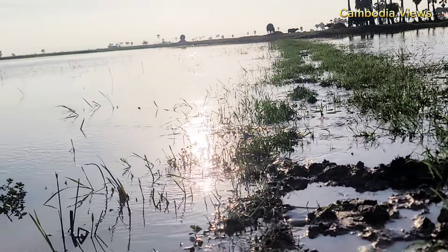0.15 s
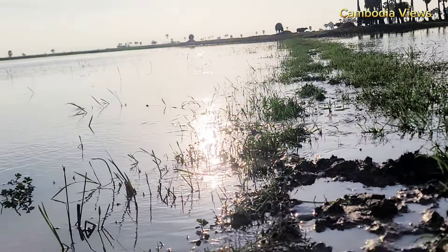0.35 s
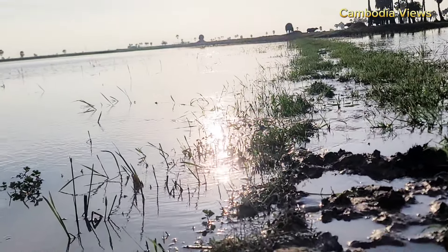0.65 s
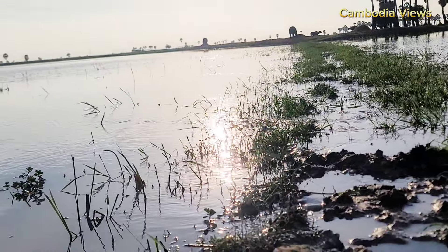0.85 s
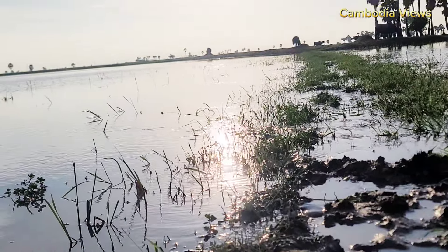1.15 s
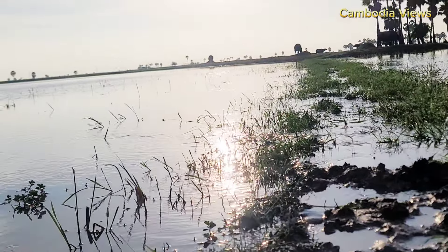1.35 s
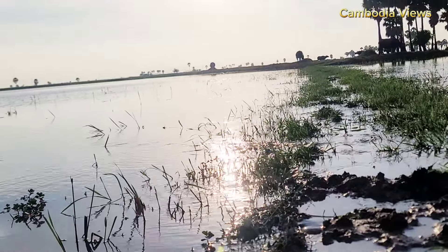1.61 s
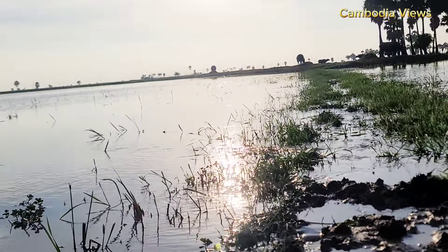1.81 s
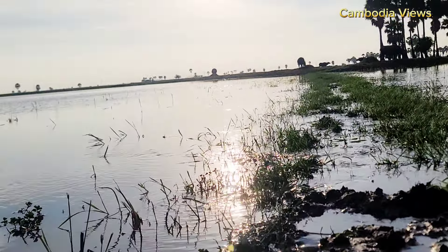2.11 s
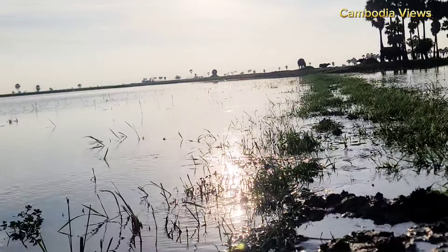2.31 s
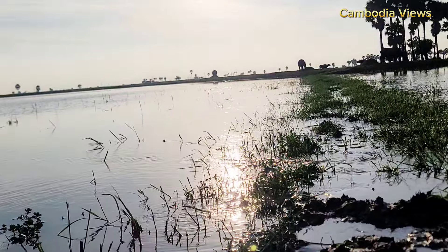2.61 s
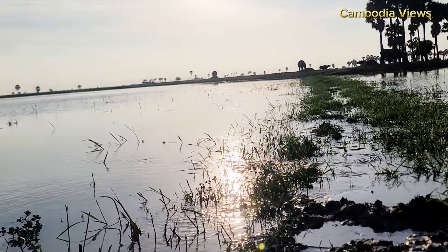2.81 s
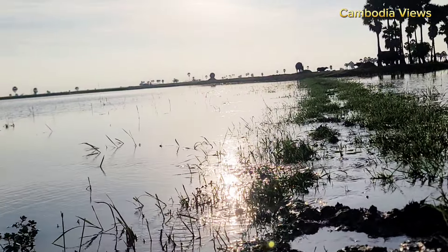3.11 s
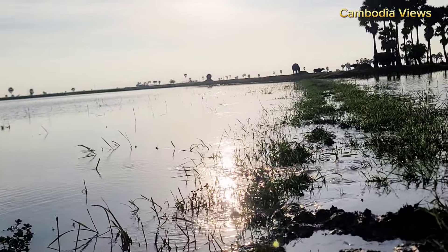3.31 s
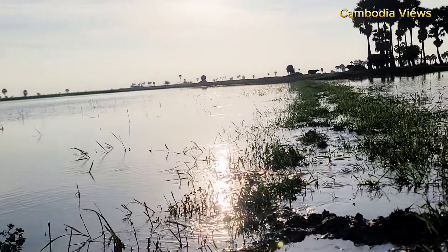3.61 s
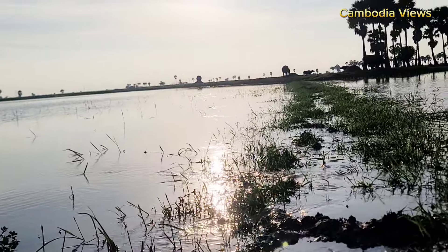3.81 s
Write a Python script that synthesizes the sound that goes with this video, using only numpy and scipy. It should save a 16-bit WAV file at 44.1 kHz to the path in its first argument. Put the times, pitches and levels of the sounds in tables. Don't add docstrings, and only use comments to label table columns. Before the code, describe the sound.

Many frogs trill in fast overlapping click bursts while wind rumbles and pops close by.

```python
import sys
import numpy as np
from scipy import signal
from scipy.fft import rfft, irfft
from scipy.io import wavfile
from scipy.ndimage import uniform_filter1d

SR = 44100
rng = np.random.default_rng(int(sys.argv[2]) if len(sys.argv) > 2 else 0)


def volts(x):
    e = np.asarray(x, float) / 20
    return 10 ** e


def unload_audio(sound):
    columns = np.transpose(np.atleast_2d(sound))
    steps = np.round(np.clip(columns, -1, 1) * 32767)
    wavfile.write(sys.argv[1], SR, steps.astype(np.int16))


N = 174195
LEFT_RIGHT = np.array([[.5], [-.5]])


def curve(rows, at, log=False):
    x, y = np.array(rows, float).T
    if log:
        return np.interp(np.log(at), np.log(x), y)
    return np.interp(at, x, y)


def band(hz, wide_hz):
    f = np.arange(N // 2 + 1) * SR / N
    spectrum = rfft(rng.standard_normal(N)) / (1 + ((f - hz) * 2 / wide_hz) ** 4)
    x = irfft(spectrum, N)
    return x / x.std()


def walk(rate):
    hold = int(SR / rate)
    steps = np.repeat(rng.standard_normal(N // hold + 1), hold)
    smooth = uniform_filter1d(uniform_filter1d(steps, hold), hold)
    return 1.38 * smooth[:N]


def add(out, x, start_s):
    i = max(int(start_s * SR), 0)
    x = x[:, :N - i]
    out[:, i:i + x.shape[1]] += x


def call(length_s, db, hz, voice, modes, pan_db=0, attack_s=0.0036):
    rate, slowing, sag, lag_ms, fastest_s, scatter = voice
    release_s, droop_db, click_rise_s = 0.0035, -2, .00011
    size_db = 110 * scatter
    chance = rng.standard_normal((64, 3))

    even_times = np.arange(64) / rate
    gaps = (1 + slowing * np.abs(even_times - fastest_s)) / rate
    t = np.cumsum(gaps) - gaps[0] + scatter * chance[:, 0] / rate
    keep = t < length_s
    t, chance = np.abs(t[keep]), chance[keep]

    size = volts(db + size_db * chance[:, 1] + droop_db * t / length_s)
    size = size * np.clip((t + 1 / rate) / attack_s, 0, 1)
    size = size * np.clip((length_s - t) / release_s, .3, 1)
    pitch = hz * (1 - sag * np.abs(t - fastest_s)) * (1 + scatter / 3 * chance[:, 2])

    out = np.zeros((2, int(length_s * SR) + 512))
    arrivals = (t + max(lag_ms, 0) / 1000, t - min(lag_ms, 0) / 1000)
    for c, when in enumerate(arrivals):
        at = np.ceil(when * SR).astype(int)[:, None] + np.arange(400)
        age = at / SR - when[:, None]
        ring = 0
        for mode in modes:
            multiple, mode_db, t60_ms = mode[0], mode[1 + c], mode[3]
            tone = np.sin(2 * np.pi * multiple * pitch[:, None] * age)
            ring = ring + volts(mode_db) * tone * volts(-60000 * age / t60_ms)
        ring = ring * (1 - np.exp(-age / click_rise_s))
        gain = 2.6 * volts(pan_db * (.5 - c))
        clicks = gain * size[:, None] * ring
        out[c] = np.bincount(at.ravel(), clicks.ravel(), out.shape[1])[:out.shape[1]]
    return out


# (time [s], length [s], level [dB])
NEAR_FROG_CALLS = [(0.032, 0.089, -11), (0.272, 0.088, -11.5), (0.524, 0.089, -12), (0.773, 0.089, -12),
                   (1.034, 0.092, -12), (1.313, 0.091, -12)]
# (multiple of throat pitch [ratio], left level [dB], right level [dB], 60 dB decay [ms])
NEAR_THROAT = [(.55, 12.5, 1, 0.83), (1., 8, 6.5, 6.6), (1.3, 9, 4.5, 1.61), (1.7, 8, 0.5, 1.13),
               (2.9, -7.5, -36, 5.4)]


def near_frog():
    voice = (450, 4.5, 1., -.41, .022, .012)
    out = np.zeros((2, N))
    for start_s, length_s, db in NEAR_FROG_CALLS:
        add(out, call(length_s, db, 3900, voice, NEAR_THROAT), start_s)
    return out


# (time [s], length [s], level [dB])
LEFT_FROG_CALLS = [(2.885, 0.037, -10.5), (2.924, 0.028, -9.5), (3.143, 0.077, -10.5),
                   (3.387, 0.066, -15.5), (3.714, 0.069, -12), (3.933, 0.034, -10)]
# (multiple of throat pitch [ratio], left level [dB], right level [dB], 60 dB decay [ms])
LEFT_THROAT = [(.55, 7, 0.5, 0.62), (1., 3.5, -18.5, 5), (1.3, -19, -5, 1.5), (1.8, -6, -2.5, 1.3),
               (2.9, -44, -44, 4.8)]


def left_frog():
    voice = (470, 3., .7, -.41, .01, .018)
    out = np.zeros((2, N))
    for start_s, length_s, db in LEFT_FROG_CALLS:
        add(out, call(length_s, db, 3780, voice, LEFT_THROAT), start_s)
    return out


# (time [s], length [s], level [dB])
RIGHT_FROG_CALLS = [(0.124, 0.061, -12.5), (0.46, 0.071, -12), (0.692, 0.048, -13.5), (0.74, 0.034, -15.5),
                    (0.898, 0.069, -16.5), (1, 0.092, -19), (1.269, 0.061, -11.5), (1.513, 0.06, -12.5),
                    (1.751, 0.071, -13.5), (1.993, 0.067, -12), (2.226, 0.066, -11), (3.539, 0.053, -15),
                    (3.784, 0.047, -19.5), (3.869, 0.054, -19.5)]
# (multiple of throat pitch [ratio], left level [dB], right level [dB], 60 dB decay [ms])
RIGHT_THROAT = [(.55, -30, -5, 1.3), (1., 3.5, 3, 12.5), (1.3, -38, -63, 0.25), (1.73, -17, -5, 5.3),
                (3.3, -29, -19.5, 9.2)]


def right_frog():
    voice = (480, 3.6, 0.9, 0.05, .012, .017)
    out = np.zeros((2, N))
    for start_s, length_s, db in RIGHT_FROG_CALLS:
        add(out, call(length_s, db, 3660, voice, RIGHT_THROAT), start_s)
    return out


# (time [s], length [s], level [dB])
DEEP_FROG_CALLS = [(0.485, 0.011, -17), (0.516, 0.0089, -10), (0.666, 0.014, -14.5), (0.717, 0.025, -12.5),
                   (0.738, 0.0051, -8), (0.755, 0.01, -10.5), (0.896, 0.018, -8.5), (1.146, 0.0083, -12),
                   (1.159, 0.027, -11.5), (1.253, 0.013, -7), (1.386, 0.036, -15), (1.427, 0.017, -12.5),
                   (1.449, 0.012, -10), (1.468, 0.037, -8.5), (1.611, 0.011, -12.5), (1.624, 0.019, -9.5),
                   (1.657, 0.042, -13.5), (1.79, 0.012, -10.5), (1.849, 0.025, -11), (1.94, 0.02, -9),
                   (2.091, 0.038, -10), (2.207, 0.026, -10), (2.306, 0.024, -9.5), (2.364, 0.028, -9)]
# (multiple of throat pitch [ratio], left level [dB], right level [dB], 60 dB decay [ms])
DEEP_THROAT = [(.6, -16, -16, 2), (1., -1, 0, 9), (1.9, -22, -20, 3)]


def deep_frog():
    voice = (275, 1.24, -.4, 0.85, 0, .03)
    out = np.zeros((2, N))
    for start_s, length_s, db in DEEP_FROG_CALLS:
        add(out, call(length_s, db, 3127, voice, DEEP_THROAT), start_s)
    return out


# (time [s], length [s], level [dB], throat pitch [Hz])
CLIMBING_CALLS = [(0.646, 0.054, -13, 4020), (.957, 0.046, -10.5, 3750), (1.863, 0.044, -13, 3370),
                  (3.206, 0.054, -11, 3800)]
# (time [s], length [s], level [dB], throat pitch [Hz])
ARCHING_CALLS = [(0.346, 0.058, -13, 4000), (0.625, 0.042, -16, 3680), (1.692, 0.059, -11.5, 3980),
                 (2.193, 0.028, -15.5, 3540), (2.508, 0.091, -14.5, 3640), (2.621, 0.062, -20, 3850),
                 (2.804, .082, -13.5, 3620), (3.045, 0.053, -17.5, 3590), (3.096, .077, -21, 3460),
                 (3.286, 0.049, -15.5, 3670)]
# (multiple of throat pitch [ratio], left level [dB], right level [dB], 60 dB decay [ms])
MIDDLE_THROAT = [(.55, -12, -11.5, 1.46), (1., 3.5, 4.5, 12.1), (1.3, -12, -26, 1.5),
                 (1.72, -19.5, -10.5, 4.3)]


def middle_frogs():
    climbing_voice = (400, -1.2, -1.3, .1, 0, .018)
    arching_voice = (450, 3.5, 1.6, .1, .028, .02)
    out = np.zeros((2, N))
    for start_s, length_s, db, hz in CLIMBING_CALLS:
        add(out, call(length_s, db, hz, climbing_voice, MIDDLE_THROAT, attack_s=.03), start_s)
    for start_s, length_s, db, hz in ARCHING_CALLS:
        add(out, call(length_s, db, hz, arching_voice, MIDDLE_THROAT, attack_s=.008), start_s)
    return out


# (time [s], length [s], level [dB], throat pitch [Hz])
FAR_FROG_CALLS = [(0., 0.027, -22, 3720), (0.213, 0.066, -21.5, 3530), (0.411, 0.047, -24, 3890),
                  (.865, 0.028, -41, 3750), (1.121, 0.094, -20.5, 3410), (1.198, 0.022, -20.5, 3750),
                  (2.136, 0.019, -21.5, 3880), (2.383, 0.054, -23, 3730), (2.44, 0.044, -38.5, 3260),
                  (2.596, 0.017, -16, 3540), (2.678, 0.066, -22.5, 3540), (2.747, 0.05, -19, 3510),
                  (3.001, 0.052, -32.5, 3540), (3.458, 0.026, -31, 3570), (3.519, 0.028, -21.5, 4040),
                  (3.633, 0.11, -30.5, 3540)]
# (multiple of throat pitch [ratio], left level [dB], right level [dB], 60 dB decay [ms])
FAR_THROAT = [(.55, -37.5, -15, 5.7), (1.001, 8.5, 13, 7.6), (1.75, -3, -28, 1.8)]


def far_frogs():
    voice = (460, 2.8, 1.2, 0.15, .018, .018)
    crowd_calls, crowd_db, spread_db, crowd_hz = 110, -33.5, 4, 3550
    out = np.zeros((2, N))
    for start_s, length_s, db, hz in FAR_FROG_CALLS:
        add(out, call(length_s, db, hz, voice, FAR_THROAT, attack_s=0.017), start_s)
    for k, (louder, higher, aside) in enumerate(rng.standard_normal((crowd_calls, 3))):
        db = crowd_db + spread_db * louder
        hz = crowd_hz * (1 + .05 * higher)
        add(out, call(.06, db, hz, voice, FAR_THROAT, pan_db=3 * aside), k / crowd_calls * N / SR)
    return out


def frogs():
    echo_db, echo_t60_s = -16, .12
    out = near_frog() + left_frog() + right_frog() + deep_frog() + middle_frogs() + far_frogs()
    age = np.arange(8000) / SR
    tail = rng.standard_normal((2, len(age))) * volts(-60 * age / echo_t60_s)
    tail = tail * volts(echo_db) / np.sqrt(np.sum(tail ** 2, 1, keepdims=True))
    return out + signal.fftconvolve(out, tail, axes=1)[:, :N]


# (time [s], level [dB])
GUST_STRENGTH = [(0.0, -19), (0.03, -14), (0.05, -23.5), (0.26, -10.5), (0.31, -24), (0.42, -8.5),
                 (0.57, -23), (0.64, -13), (0.86, -21), (0.96, -14), (1.37, -19.5), (1.56, -14.5),
                 (1.65, -17.5), (2.32, -13.5), (2.45, -10.5), (2.97, -15), (3.0, -12.5), (3.95, -11.5)]
# (frequency [Hz], level per Hz [dB])
WIND_COLOUR = [(12, -36), (20, -6.5), (59, 2), (171, -7), (756, -36.5), (840, -43.5), (949, -56),
               (1300, -52), (1690, -79), (2860, -120)]


def wind(t):
    wind_db, pan_db, swell_db, flicker_db = 1.36, 2, 2., 2.2
    like = 0.65
    out, swell = 0, walk(16)
    for hz in 25 * 2 ** np.arange(0, 6, .5):
        mid, side = band(hz, hz / 2), band(hz, hz / 2)
        db = curve(WIND_COLOUR, hz, True) + 10 * np.log10(hz)
        db = db + swell_db * swell + flicker_db * walk(14)
        ports = np.sqrt(1 + like) * mid + np.sqrt(1 - like) * side * np.array([[1], [-1]])
        out = out + volts(db) * ports
    return out / out.std() * volts(curve(GUST_STRENGTH, t) + wind_db + LEFT_RIGHT * pan_db)


# (time [s], level [dB], left over right [dB])
PORT_POPS = [(0.0314, -35, 11.5), (0.2732, -25, 3), (0.5257, -29, -3.5), (0.7322, -31, 1),
             (0.7756, -36.5, -1), (1.5683, -32, 14), (1.718, -34, 1.0), (1.94, -26.5, -8.5),
             (2.4695, -42, 8), (2.7778, -36, 12), (3.1463, -47, -1), (3.3323, -30, 2), (3.3914, -35, 13)]


def pops():
    fall_s, rise_s = 0.0017, .00008
    out, t = np.zeros((2, N)), np.arange(300) / SR
    step = np.exp(-t / fall_s) - np.exp(-t / rise_s)
    for start_s, db, pan_db in PORT_POPS:
        add(out, volts(db + 18 + LEFT_RIGHT * pan_db) * step, start_s)
    return out


# (time [s], length [s], level [dB], top pitch [Hz], brightest frequency [Hz])
BIRD_SQUAWKS = [
    (2.726, 0.034, -15, 1122, 5880),
    (3.42, 0.055, -17.5, 1164, 8900),
]
# (frequency [Hz], level [dB])
BEAK_COLOUR = [(1000, -11.5), (2200, -6), (3300, -3), (5500, -9), (9000, -1.5), (12000, -33)]


def bird():
    rise_s, sag, rasp = .008, 0.23, .018
    dims_db, bright_db, bright_octaves = 2.26, 12, .3
    out = np.zeros((2, N))
    for start_s, length_s, db, hz, bright_hz in BIRD_SQUAWKS:
        t = np.arange(int(length_s * SR)) / SR
        glide = np.interp(t, [0, rise_s, length_s], [.9, 1, 1 - sag])
        f = hz * glide * (1 + rasp * walk(900)[:len(t)])
        phase = 2 * np.pi * np.cumsum(f) / SR
        x = 0
        for k in range(1, 11):
            octaves_off = np.log2(k * f / bright_hz)
            peak_db = bright_db * np.exp(-(octaves_off / bright_octaves) ** 2)
            partial_db = curve(BEAK_COLOUR, k * f, True) + peak_db - k * dims_db * t / length_s * 2
            x = x + volts(partial_db) * np.sin(k * phase + k * k)
        x = x * np.clip(t / 0.0014, 0, 1) * np.clip((length_s - t) / 0.0057, 0, 1)
        add(out, volts(db) * x * np.ones((2, 1)), start_s)
    return out


# (time [s], length [s], level [dB], pitch [Hz], second partial level [dB])
BIRD_CHIRPS = [
    (2.779, .014, -17, 1722, 12),
    (3.519, 0.0093, -12, 2020, 0.5),
]


def bird_chirps():
    out = np.zeros((2, N))
    for start_s, length_s, db, hz, second_db in BIRD_CHIRPS:
        t = np.arange(int(length_s * SR)) / SR
        partials_db = [0, second_db] + [-12 - 3 * k for k in range(5)]
        shape = volts(db - 5 * t / length_s) * np.clip(t / 0.00022, 0, 1)
        shape = shape * np.clip((length_s - t) / 0.0014, 0, 1)
        ports = []
        for lead_s in (0, .00009):
            tone = sum(volts(partial_db) * np.sin(2 * np.pi * (k + 1) * hz * (t + lead_s))
                       for k, partial_db in enumerate(partials_db))
            ports.append(shape * tone)
        add(out, np.array(ports), start_s)
    return out


# (time [s], level [dB])
CRICKET_EFFORT = [
    (1.7, -59),
    (2.4, -47.5),
    (3.95, -54),
]


def cricket(t):
    chirps_per_s, strokes_per_s, chirp_end_s = 9.2, 140, 2.665
    chirp = ((t - chirp_end_s) * chirps_per_s) % 1
    swell = chirp ** .8 * np.clip((1 - chirp) * 20, 0, 1)
    strokes = .6 + .4 * np.cos(2 * np.pi * (t * strokes_per_s + .3 * walk(20)))
    return volts(curve(CRICKET_EFFORT, t)) * swell * strokes * band(9400, 330)


def katydid():
    return volts(-70 + 6 * walk(30)) * band(15035, 40.) * volts(LEFT_RIGHT * 5)


def far_drone():
    return np.array([volts(-43 + 7.2 * walk(8.1)) * band(848, 71) for _ in range(2)])


def hiss():
    return volts(-66) * rng.standard_normal((2, N))


# (frequency [Hz], level [dB])
MICROPHONE_COLOUR = [(1200, -24), (1700, -2), (3500, -2.14), (6900, -5), (7400, -20.5), (8100, -29.5),
                     (9500, -11), (15000, -17)]


def scene():
    t = np.arange(N) / SR
    voices = frogs() + bird() + bird_chirps() + hiss()
    hz = np.arange(1, N // 2 + 2) * SR / N
    coloured = irfft(rfft(voices) * volts(curve(MICROPHONE_COLOUR, hz, True)), N)
    return coloured + wind(t) + pops() + cricket(t) + katydid() + far_drone()


def band_limit(x):
    return signal.sosfilt(signal.butter(12, 15700, fs=SR, output="sos"), x)


def record(dry):
    ceiling, knee = 1.12, 8
    rounded = dry / (1 + np.abs(dry / ceiling) ** knee) ** (1 / knee)
    top_cut = signal.ellip(8, .2, 70, 15700, fs=SR, output="sos")
    mix = np.clip(signal.sosfilt(top_cut, rounded), -1, 1)
    return band_limit(mix)


dry = scene()
out = record(dry)
unload_audio(out)
```